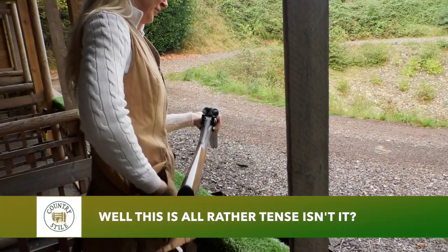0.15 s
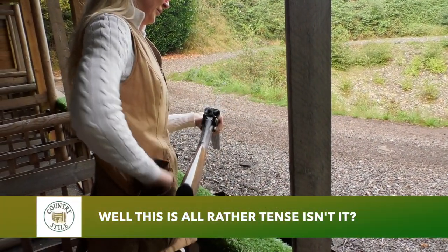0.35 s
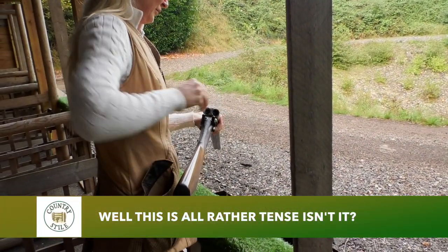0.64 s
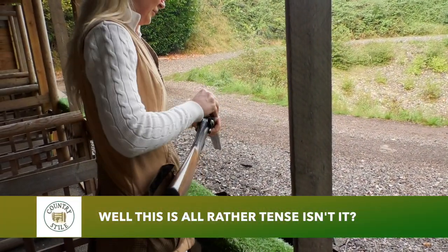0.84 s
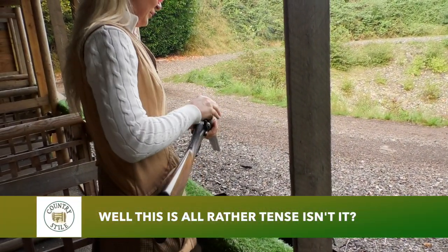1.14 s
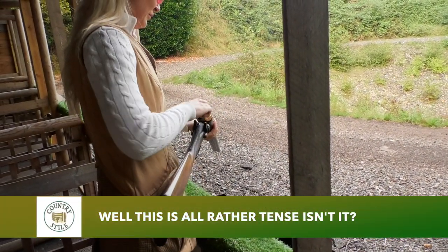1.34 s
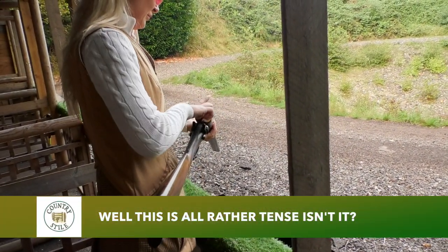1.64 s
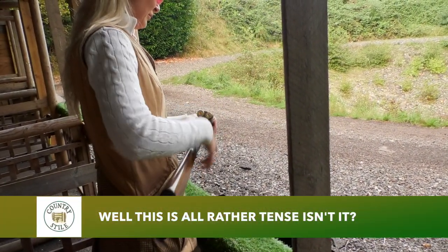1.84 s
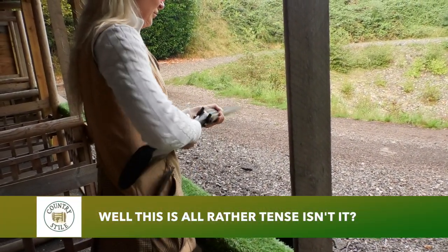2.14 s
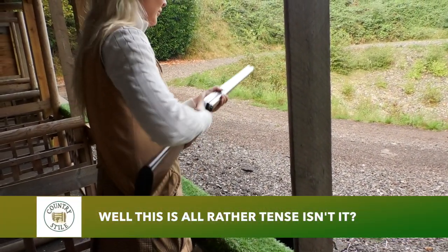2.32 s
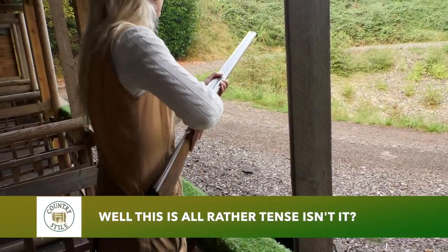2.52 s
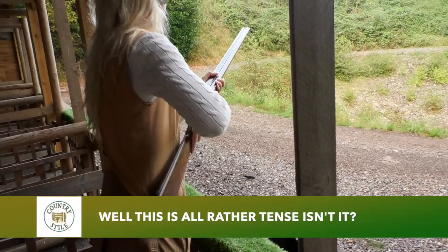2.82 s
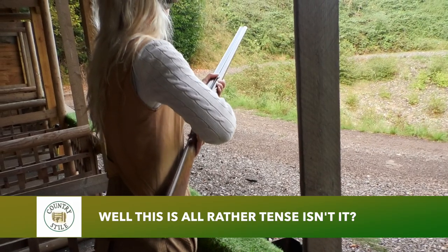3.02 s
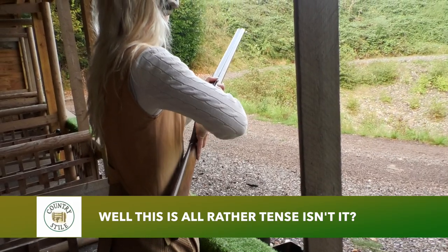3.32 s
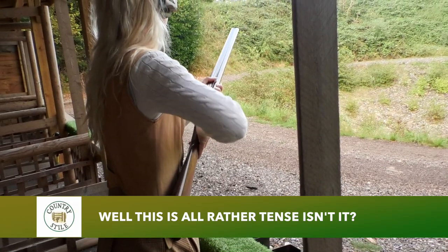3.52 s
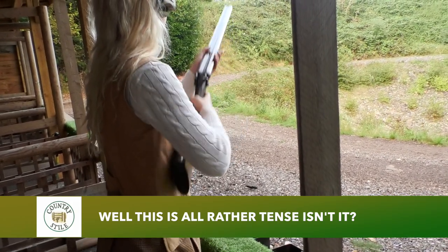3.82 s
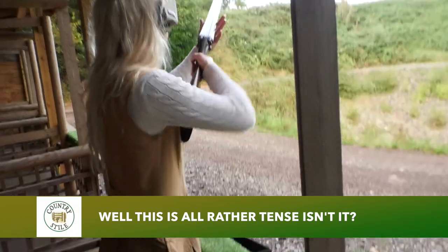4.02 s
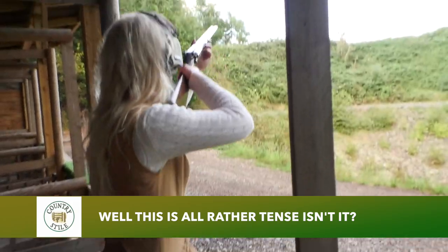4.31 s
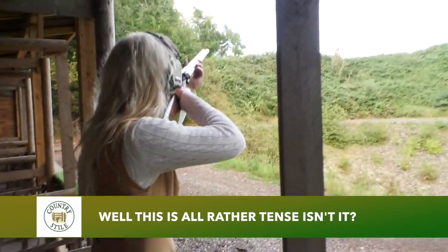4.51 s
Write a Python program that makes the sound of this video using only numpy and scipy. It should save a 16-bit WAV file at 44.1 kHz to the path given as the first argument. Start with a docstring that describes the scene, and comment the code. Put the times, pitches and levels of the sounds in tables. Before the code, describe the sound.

Close and mostly dry: gentle pocket and sleeve rustling, scattered light taps and brassy ticks as a gun is loaded, one faint distant bird whistle, then a rapid cluster of clacks ending in the loudest steel slam. Two separate sharp cocking clicks follow, each with a little settling tick. Quiet clothing movement ends it. Open air is barely audible; wooden boards add a short, weak tail.

```python
"""A hammer shotgun is loaded, closed and cocked under a wooden porch roof in quiet countryside.
Cartridges tick into the chambers, the hinge squeaks, the barrels slam home and the bolt snaps in; each hammer
clicks over its sear. Steel and wood ring as damped modes, with bursts of noise for the hard contacts.
Clothes rustle and hands slide as shaped noise; behind them lies soft air, and a far bird whistles once."""
import sys
import numpy as np
from scipy import signal
from scipy.fft import rfft, irfft, next_fast_len
from scipy.io import wavfile
from scipy.ndimage import map_coordinates

SR = 44100
rng = np.random.default_rng(int(sys.argv[2]) if len(sys.argv) > 2 else 0)


def inscribe(sig):
    """Save sig as 16-bit PCM at rate SR to the path in sys.argv[1].

    A 1-D sig is mono; a 2-D sig holds one channel per row.
    Samples are clipped to [-1, 1] before scaling.
    """
    pcm = np.round(np.clip(np.atleast_2d(sig).T, -1, 1) * 32767)
    wavfile.write(sys.argv[1], SR, pcm.astype(np.int16))


N = 205581
T = np.arange(SR // 4) / SR  # seconds within one short sound
CLOCK = np.arange(N) / SR  # seconds within the whole scene

# Ringing of the steel action. Each row: mode in Hz, level in dB, t60 in seconds.
ACTION_MODES = [(1170, -2, .05), (1378, -7.5, .03), (1567, -11.5, .036), (1798, -10.5, .025),
                (1940, -6, .018), (2010, -4.5, .04), (2187, -4, .028), (2304, -5, .025), (2440, -2.5, .022),
                (2790, -3, .016), (2920, -4.5, .02), (3070, -4, .024), (3400, -3, .016), (3790, -4.5, .015),
                (4100, -6, .022), (4500, -8, .014)]
# Ringing of the wooden stock. Each row: mode in Hz, level in dB, t60 in seconds.
STOCK_MODES = [(393, -5, .04), (506, -7.5, .017), (635, -5.5, .04), (780, -4, .018), (867, -3.5, .03),
               (980, -5.5, .03), (1105, -3, .028)]


def amp(db):
    """Decibels to a factor on sound pressure."""
    return 10 ** (np.asarray(db) / 20)


def unit(x):
    """Scale a steady sound to rms 1."""
    return x / np.sqrt(np.mean(x ** 2) + 1e-20)


def pulse(x):
    """Scale a transient to the energy of 4 ms at rms 1."""
    energy = np.sum(x ** 2) + 1e-20
    return x * np.sqrt(.004 * SR / energy)


def fade(t, t60):
    """Exponential decay that loses 60 dB in t60 seconds."""
    return amp(-60 * t / np.maximum(t60, 1e-3))


def onset(t, rise_s):
    """Gain that climbs from silence towards 1 with time constant rise_s."""
    return 1 - np.exp(-t / rise_s)


def swell(s, hold_s, db, rise_s, fall_s):
    """Gain that grows 20 dB in rise_s up to time s, holds, and loses 20 dB in each fall_s."""
    outside = np.maximum((s - CLOCK) / rise_s, (CLOCK - s - hold_s) / fall_s)
    return amp(db - 20 * np.clip(outside, 0, 10))


def along(points, hz):
    """Interpolate (Hz, value) points on a log frequency axis."""
    f, v = np.transpose(points)
    return np.interp(np.log(hz + 1), np.log(f + 1), v)


def hump(hz, centre_hz, depth_db):
    """dB of a broad peak that is depth_db down one octave from its centre."""
    return -depth_db * np.log2((hz + 1) / centre_hz) ** 2


def wobble(rate, t=CLOCK):
    """A smooth random curve, rate knots a second."""
    return map_coordinates(rng.standard_normal(SR // 8), [t * rate], mode="wrap")


def filtered(x, response):
    """Apply a response given as gain against frequency."""
    m = next_fast_len(N + SR // 2)
    spectrum = rfft(x, m) * response(np.fft.rfftfreq(m, 1 / SR))
    return irfft(spectrum, m)[:N]


def noise(spectrum):
    """Noise of rms 1, coloured by (Hz, dB) points."""
    return unit(filtered(rng.standard_normal(N), lambda hz: amp(along(spectrum, hz))))


def add(track, s, sound):
    """Mix a sound in at time s."""
    part = track[round(s * SR):][:len(sound)]
    part += sound[:len(part)]


def ring(modes, colour=np.zeros_like):
    """Damped modes; each blow lands on a new spot and excites them a little differently."""
    hz, db, t60 = np.transpose(modes)[:, :, None]
    size, shift, lag = rng.standard_normal((3, len(modes), 1))
    # neighbouring modes swing in roughly opposite directions
    phase = np.pi * np.arange(len(modes))[:, None] + .7 * lag
    # the grip shifts each mode within its own width
    shifted_hz = hz + .5 * shift / np.maximum(t60, .01)
    waves = np.sin(2 * np.pi * shifted_hz * T + phase)
    strength = amp(db + colour(hz) + 1.2 * size)
    sound = np.sum(strength * fade(T, t60) * waves, axis=0)
    return pulse(sound * onset(T, .00039))


def crack(colour, t60):
    """The crowd of short-lived overtones at a hard contact; colour gives dB at each frequency."""
    burst = rfft(rng.standard_normal(len(T)) * fade(T, t60) * onset(T, .00012))
    # so many overtones overlap that few gaps are left between them
    even = burst / (np.abs(burst) + 1e-9) ** .55
    coloured = even * amp(colour(np.fft.rfftfreq(len(T), 1 / SR)))
    return pulse(irfft(coloured, len(T)) * fade(T, 10 * t60))


def radiate(x, corner_hz):
    """A gun is too slim to push much air below its corner frequency."""
    return signal.sosfilt(signal.butter(3, corner_hz, "high", fs=SR, output="sos"), x)


def outdoors():
    """Soft distant air and one thin bird whistle, blurred by distance."""
    # Colour of the open air. Each row: frequency in Hz, level in dB per Hz.
    air_spectrum = [(15, -41), (25, -15), (62, -4.5), (100, -17.5), (150, -10), (215, -29), (293, -7),
                    (394, -5.5), (575, -7.5), (936, -1), (1370, -10), (1840, -13.5), (2410, -23.5),
                    (7310, -28.5), (14800, -37.5), (16000, -36.5)]
    # The whistle: full strength at seconds, hold in seconds, level in dB, 20 dB rise and fall in seconds.
    whistle_swell = (1.645, .015, -64, .13, .12)
    blur = wobble(110) + 1j * wobble(110) + 1
    whistle = unit(np.real(blur * np.exp(2j * np.pi * 3540 * CLOCK)))  # pitch in Hz
    air = amp(-65.6 + .84 * wobble(8.5)) * noise(air_spectrum)
    return swell(*whistle_swell) * whistle + air


def motion():
    """Gains of rubbing and of swishing: every arm movement swells and fades alike."""
    # Arm movements, from reaching into the pocket to shouldering the gun.
    # Each row: start in seconds, length in seconds, rubbing level in dB, swish level in dB.
    moves = [(.09, .04, -58.5, -68), (.36, .17, -72, -69.5), (.655, .04, -56.5, -69.5),
             (.73, .1, -51.5, -69), (.95, .16, -62, -69.5), (1.5, .06, -62, -68), (1.87, .22, -70.5, -68.5),
             (2.26, .09, -68, -63), (2.43, .06, -73, -70.5), (3.13, .06, -63, -71), (3.36, .1, -69, -68),
             (3.56, .14, -68, -66), (3.8, .07, -59.5, -68.5), (3.96, .31, -65.5, -66.3),
             (4.615, .04, -57.5, -69.5)]
    rise_s, rub_fall_s, swish_fall_s = .11, .1, .19  # for 20 dB; rubbing stops sooner
    rub, swish = amp(-79), amp(-76.8)  # the clothes are never quite still
    for s, length, rub_db, swish_db in moves:
        rub = np.maximum(rub, swell(s, length, rub_db, rise_s, rub_fall_s))
        swish = np.maximum(swish, swell(s, length, swish_db, rise_s, swish_fall_s))
    return rub, swish


def clothes(rub_gain, swish_gain):
    """Cloth rubs in uneven catches: dull from the vest pocket, bright from the sleeves."""
    # Colour of the pocket's rubbing. Each row: frequency in Hz, level in dB per Hz.
    pocket_spectrum = [(120, -20), (210, -23.5), (300, -6), (420, 3), (800, -0.5), (1200, -3.5), (1900, -7),
                       (3000, -19.5), (5000, -27), (9000, -47.5)]
    # Colour of the sleeves' swish. Each row: frequency in Hz, level in dB per Hz.
    sleeve_spectrum = [(1200, -25.5), (2300, 2.5), (3700, 2.5), (5200, -4.5), (7000, -7), (10500, -8.5),
                       (16000, -18)]
    catch = wobble(130)
    rub = unit(noise(pocket_spectrum) * amp(3.8 * catch))
    swish = unit(noise(sleeve_spectrum) * amp(catch + 2 * wobble(600)))
    return rub_gain * rub + swish_gain * swish


def chance_catches(swish_gain, count=40):
    """Faint scrapes at random moments, stronger while the arms move; rows like those of clear slides."""
    at = ((np.arange(count) + rng.random(count)) / count * (N - 1)).astype(int)
    rows = []
    for i, (size, pitch) in zip(at, rng.standard_normal((count, 2))):
        db = 20 * np.log10(swish_gain[i]) + 1 + 2.5 * size
        rows.append((i / SR, .003, db, 3650 * 2 ** (.15 * pitch)))
    return rows


def tap(body_hz, body_db, tick_db):
    """One light contact: steel body, wooden thud and a brass tick."""
    # Colour of a cartridge's tick. Each row: frequency in Hz, level in dB.
    brass_colour = [(3000, 0), (4200, 2), (5000, -2), (6100, 2.5), (8200, -3.5), (11000, 2.5), (13000, -8),
                    (16000, -13)]
    octaves = np.log2(body_hz / 2000)
    tick_hz = 6700 * 2 ** (.008 * (tick_db + 55))  # stronger ticks are brighter
    body = ring(ACTION_MODES, colour=lambda hz: hump(hz, body_hz, depth_db=14.5))
    # brighter, harder taps shake the stock less
    thud = amp(-14 - 9 * octaves) * ring(STOCK_MODES)
    tick = crack(lambda hz: hump(hz, tick_hz, depth_db=6) + along(brass_colour, hz), t60=.034)
    return amp(body_db) * (body + thud) + amp(tick_db) * tick


def loading():
    """Light taps on the action, some rattling on; a seated rim rings the breech."""
    # Cartridges and fingers on the gun. Each row: start in seconds, body level in dB, body centre in Hz,
    # tick level in dB, number of contacts (more than one is a rattle).
    taps = [(.0313, -54.5, 3600, -64, 1), (.0683, -47, 2700, -70, 1), (.0768, -48.5, 2850, -65, 1),
            (.455, -51.5, 3500, -58, 1), (.5714, -50, 2350, -63, 1), (.7261, -46, 4100, -59, 1),
            (.8073, -48, 900, -64, 1), (.9376, -43, 2000, -51, 1), (.9498, -34.5, 3200, -47, 1),
            (1.0155, -49, 2200, -62, 1), (1.0444, -32.5, 2200, -48, 3), (1.1086, -49.5, 2100, -68, 1),
            (1.1213, -50, 2600, -51, 1), (1.1403, -42, 2220, -54.5, 1), (1.161, -53, 3350, -65, 1),
            (1.4138, -55.5, 4600, -67, 1), (1.494, -52.5, 1600, -64, 1), (1.508, -50, 1700, -59.5, 1),
            (1.546, -42.5, 1100, -59.5, 1), (1.618, -45, 1750, -63, 1), (1.7296, -49.5, 1550, -68, 1),
            (1.9206, -41.5, 2150, -60, 2), (1.9456, -46.5, 2300, -61, 1), (1.9654, -41, 2250, -46, 1),
            (2.0399, -51, 2900, -50, 1), (2.424, -47.5, 4800, -54, 1)]
    # Cartridge rims seating in the breech. Each row: start in seconds, level in dB.
    seatings = [(0.952, -36.5), (1.045, -47)]
    # Ringing of the open breech. Each row: mode in Hz, level in dB, t60 in seconds.
    breech_modes = [(2090, 4, 0.029), (3350, -13, 0.043), (2750, -5, .03), (4020, -12, .04),
                    (4710, -4, 0.04), (8900, -13, .05), (5310, -4, 0.042), (6200, -14, 0.099),
                    (6300, -11, 0.066), (6960, -3, 0.048), (8400, -23, 0.11), (11100, -2, 0.065),
                    (11090, -6, 0.068), (11800, 5, 0.021)]
    rattle_s, rattle_loss_db = .0145, 5  # from each contact to the next
    out = np.zeros(N)
    for s, body_db, body_hz, tick_db, count in taps:
        for k in range(round(count)):
            loss = k * rattle_loss_db
            add(out, s + k * rattle_s, tap(body_hz, body_db - loss, tick_db - loss))
    for s, db in seatings:
        add(out, s, amp(db) * ring(breech_modes))
    return radiate(out, corner_hz=258)


def scrapes(rows):
    """Short slides made of many tiny catches."""
    out, lead = np.zeros(N + len(T)), len(T) // 2
    for s, half, db, centre_hz in rows:
        grit = rng.standard_normal(len(T)) * amp(1.6 * wobble(650, T))
        gain = amp(hump(np.fft.rfftfreq(len(T), 1 / SR), centre_hz, depth_db=11.5))
        grit = unit(irfft(rfft(grit) * gain, len(T)))
        bell = np.exp(-.5 * ((T - T[lead]) / half) ** 2)
        add(out, s, amp(db) * grit * bell)
    return out[lead:][:N]  # each slide now peaks at its own s


def closing():
    """The lever trips, the barrels meet the breech and the bolt shoots home."""
    # Blows of the closing action. Each row: start in seconds, body level in dB, body centre in Hz,
    # thud level in dB, crack level in dB, t60 in seconds of the burst behind the crack.
    blows = [(2.1383, -31.5, 2650, -48, -34, .018), (2.1465, -36, 2400, -38.5, -36.5, .09),
             (2.1678, -35, 2700, -36, -30, .075), (2.1864, -43, 3300, -42, -39, .017),
             (2.2077, -37, 2450, -48, -46.5, .025), (2.2143, -11, 2430, -23.5, -22, .026),
             (2.219, -22, 2300, -32, -31.5, .01), (2.2226, -14.5, 4400, -23, -12.7, .0105),
             (2.2315, -32, 3500, -40, -33.5, .045)]
    # The top lever's spring is jarred. Each row: start in seconds, level in dB.
    jars = [(2.1383, -27), (2.1875, -44)]
    # Ringing of that spring. Each row: mode in Hz, level in dB, t60 in seconds.
    lever_modes = [(1147, -14, 0.18), (2140, -1, 0.044), (3530, -12.5, .09), (4640, -12.5, .055),
                   (5460, -6.5, .04), (6900, -3, .06), (8100, -9.5, .048), (11000, -14.5, .11)]
    # Colour of steel striking steel. Each row: frequency in Hz, level in dB.
    edge_colour = [(3000, 1), (4200, 4.5), (5500, -6.5), (7200, 0.5), (9000, -4), (11200, 0.5),
                   (13000, -7.5), (16000, -11)]
    out = np.zeros(N)
    for s, body_db, body_hz, thud_db, crack_db, t60 in blows:
        crack_hz = 1.75 * body_hz
        snap = crack(lambda hz: hump(hz, crack_hz, depth_db=4.5) + along(edge_colour, hz), t60)
        body = ring(ACTION_MODES, colour=lambda hz: hump(hz, body_hz, depth_db=8))
        thud = ring(STOCK_MODES)
        add(out, s, amp(body_db) * body + amp(thud_db) * thud + amp(crack_db) * snap)
    for s, db in jars:
        add(out, s, amp(db) * ring(lever_modes))
    out = radiate(out, corner_hz=385)
    # the whole gun jolts in the hands
    jolt = crack(lambda hz: hump(hz, 48, depth_db=3.5), t60=.24)
    add(out, 2.222, amp(-51.5) * jolt)
    return out


def hinge(pitch_hz=2190, overtone_hz=3080, stock_hz=405):
    """Steel sticks and slips on steel for a moment, singing roughly and shaking the stock."""
    # The one squeak: full strength at seconds, hold in seconds, level in dB, 20 dB rise and fall in seconds.
    squeak_swell = (2.1698, .0038, -14.2, .0052, .0058)
    pitch = np.sin(2 * np.pi * pitch_hz * CLOCK + 1.1 * wobble(450))
    overtone = np.sin(2 * np.pi * overtone_hz * CLOCK + wobble(500))
    grind = unit(filtered(rng.standard_normal(N), lambda hz: amp(hump(hz, 2300, depth_db=22.5))))
    tone = pitch + amp(-12) * overtone + amp(-8) * grind
    out = swell(*squeak_swell) * unit(tone)
    shake = np.sin(2 * np.pi * stock_hz * T) * fade(T, .09) * onset(T, .003)
    add(out, 2.171, amp(-34) * shake)
    return radiate(out, corner_hz=340)


def cocking():
    """Each sear drops into its notch: the lock plate knocks the stock and the mainspring pings."""
    # Hammers dropping onto their sears and settling back. Each row: start in seconds, body level in dB,
    # thud level in dB, crack level in dB, spring pitch in Hz, spring level in dB.
    clicks = [(3.0192, -21.5, -42, -19.7, 9500, -23.5), (3.0949, -54.5, -57.5, -56, 9500, -75),
              (3.1692, -54, -68, -70, 9500, -79), (3.5014, -20, -35, -17, 8800, -31),
              (3.5811, -40, -44, -47, 8400, -55)]
    # Ringing of hammer and lock. Each row: mode in Hz, level in dB, t60 in seconds.
    hammer_modes = [(433.5, -11, .04), (560, -14, .025), (643.6, -13, .025), (980, -6.5, .017),
                    (1262, -3.5, .032), (1940, 0, .02), (2180, -4, .027), (2340, 4.5, .02), (2560, -1, .02),
                    (2700, 0, .015), (2980, 0, .014), (3270, -9, .03)]
    # Colour of the sear's crack. Each row: frequency in Hz, level in dB.
    sear_colour = [(300, -37), (900, -9.5), (1550, -13), (2500, 7.5), (4200, -2.5), (6500, 0.5), (9000, 5),
                   (11000, -3), (13000, -5), (15500, -18)]
    out = np.zeros(N)
    for s, body_db, thud_db, crack_db, spring_hz, spring_db in clicks:
        spring = pulse(np.sin(2 * np.pi * spring_hz * T) * fade(T, .018))
        snap = crack(lambda hz: along(sear_colour, hz), t60=.017)
        knock = amp(body_db) * ring(hammer_modes) + amp(thud_db) * ring(STOCK_MODES)
        add(out, s, amp(crack_db) * snap + amp(spring_db) * spring + knock)
    return radiate(out, corner_hz=406)


def porch(x, near_db, tail_db):
    """Posts and boards scatter the sound at once; a weak tail lingers under the roof."""
    # Decay under the roof. Each row: frequency in Hz, t60 in seconds.
    roof_decay = [(100, 0.41), (500, .36), (2500, 0.22), (7000, 0.15), (14000, 0.097)]
    # What the boards reflect. Each row: frequency in Hz, level in dB.
    wood_colour = [(100, 0), (700, 1), (2500, -5.5), (7000, 2), (10000, -9.5), (15000, -4)]
    hz, t, z = signal.stft(rng.standard_normal(SR // 2), SR, nperseg=256)
    tail = signal.istft(z * fade(t, along(roof_decay, hz)[:, None]), SR, nperseg=256)[1]
    tail = tail * onset(np.arange(len(tail)) / SR, .0057)
    near = rng.standard_normal(len(T)) ** 3 * fade(T, .14)  # cubing makes the reflections spiky
    response = np.zeros(SR)
    add(response, .004, amp(near_db) * near / np.linalg.norm(near))
    add(response, .008, amp(tail_db) * tail / np.linalg.norm(tail))
    reflected = signal.fftconvolve(x, response)[:N]
    return x + filtered(reflected, lambda f: amp(along(wood_colour, f)))


def scene():
    """The gun and clothes sound under the porch roof, with the open air behind."""
    # The clearest slides of a hand along the gun.
    # Each row: middle in seconds, half length in seconds, level in dB, centre in Hz.
    clear_slides = [(.11, .016, -54.5, 2200), (.179, .007, -62, 5300), (.221, .008, -60, 3700),
                    (.816, .008, -58, 2400), (.86, .004, -59, 3700), (.897, .004, -60, 3900),
                    (1.137, .01, -53, 4000), (1.54, .008, -57.5, 1800), (1.612, .006, -58.5, 2600),
                    (1.869, .007, -61.5, 3900), (3.455, .018, -65, 3800), (3.812, .022, -62, 2850),
                    (3.867, .0055, -50, 3800), (4.146, .012, -62.5, 3900), (4.604, .006, -58, 3200),
                    (4.632, .009, -61, 3600)]
    rub, swish = motion()
    slides = scrapes([*clear_slides, *chance_catches(swish)])
    handling = porch(loading() + slides + clothes(rub, swish), near_db=-13.5, tail_db=-17)
    snap = porch(closing(), near_db=-17.5, tail_db=-21)
    squeak = porch(hinge(), near_db=-21.5, tail_db=-22.5)
    hammers = porch(cocking(), near_db=-12, tail_db=-25.5)
    return (handling + snap + squeak + hammers + outdoors())[None]


def record(dry):
    """The recorder rounds off peaks near its ceiling and keeps nothing above its band limit."""
    ceiling, top_hz = .95, 15900
    rounded = dry[0] / (1 + np.abs(dry[0] / ceiling) ** 6) ** (1 / 6)
    return filtered(rounded, lambda hz: 1 / np.sqrt(1 + (hz / top_hz) ** 200))[None]


dry = scene()
out = record(dry)
inscribe(out)
```